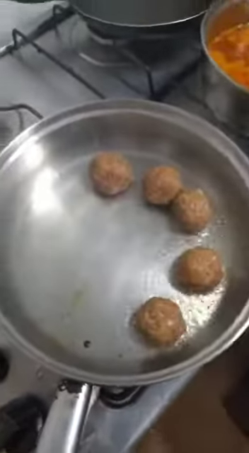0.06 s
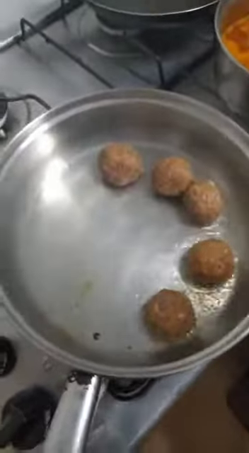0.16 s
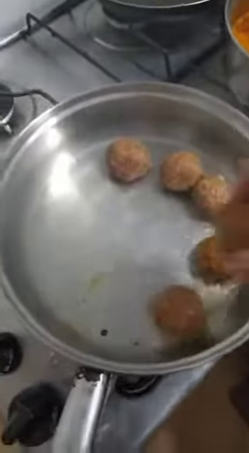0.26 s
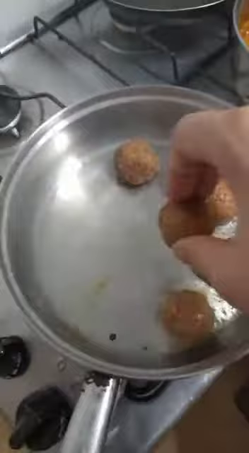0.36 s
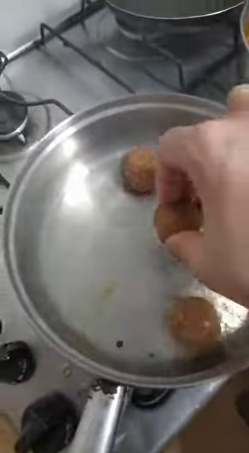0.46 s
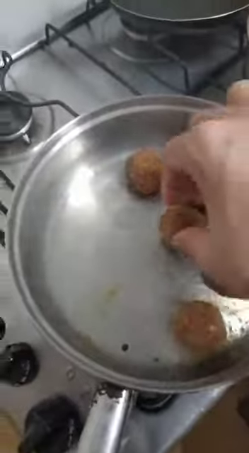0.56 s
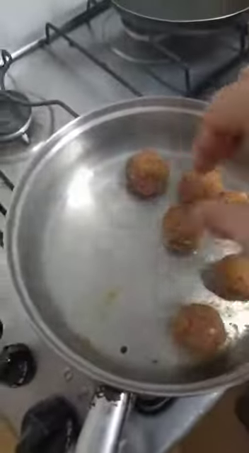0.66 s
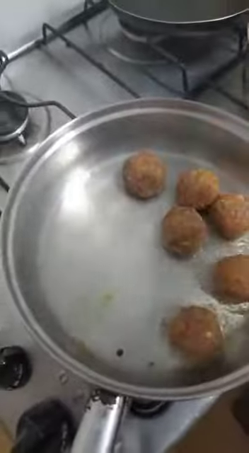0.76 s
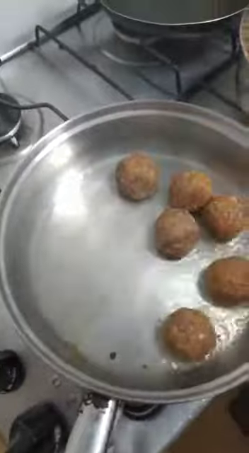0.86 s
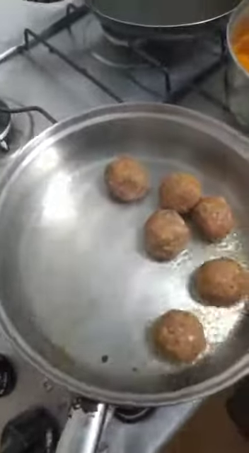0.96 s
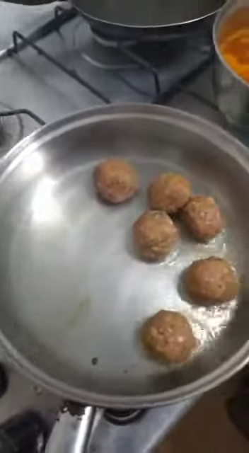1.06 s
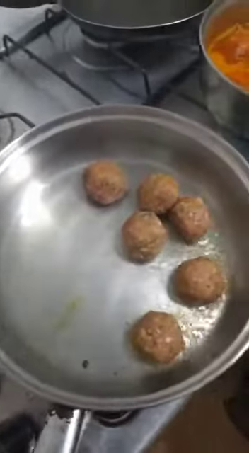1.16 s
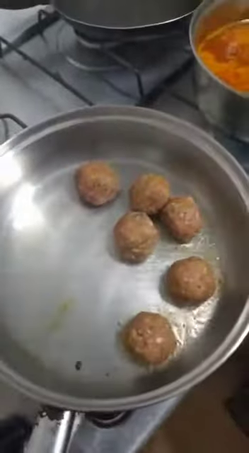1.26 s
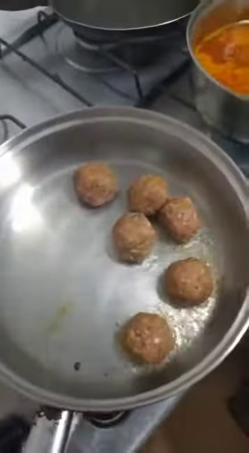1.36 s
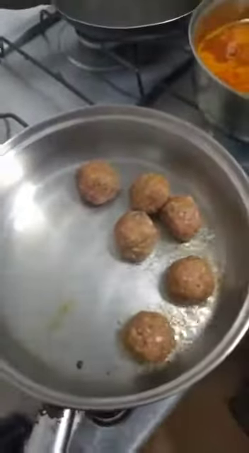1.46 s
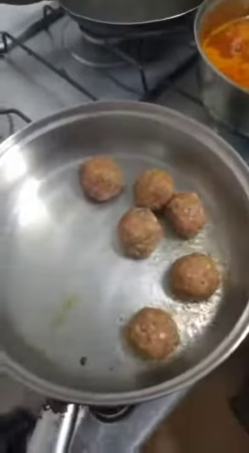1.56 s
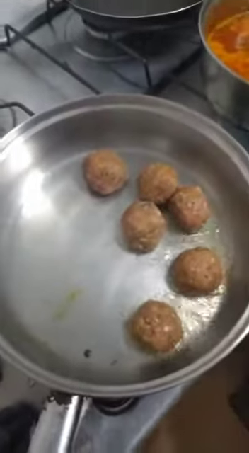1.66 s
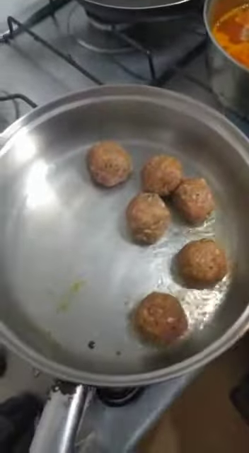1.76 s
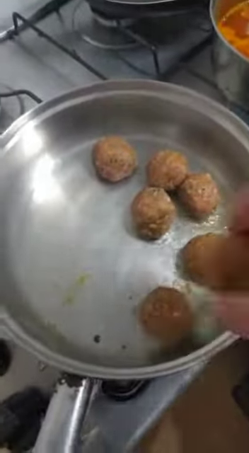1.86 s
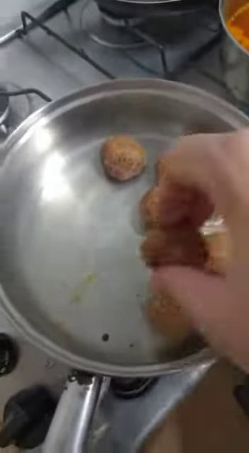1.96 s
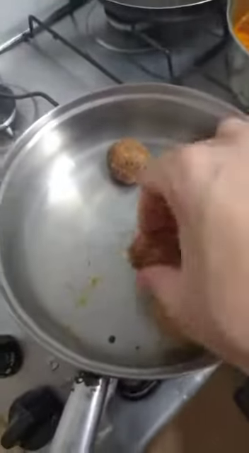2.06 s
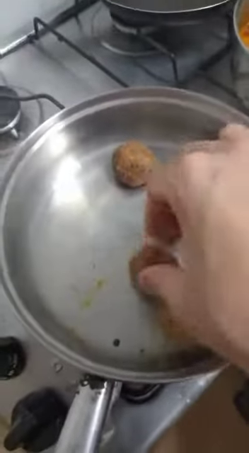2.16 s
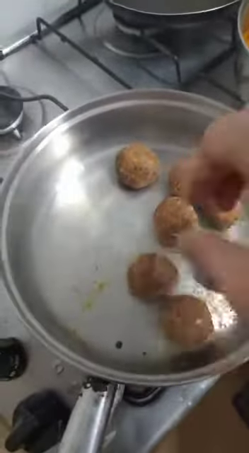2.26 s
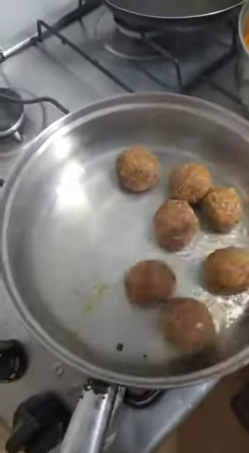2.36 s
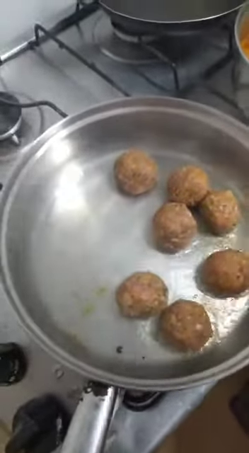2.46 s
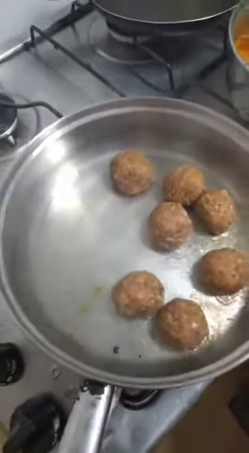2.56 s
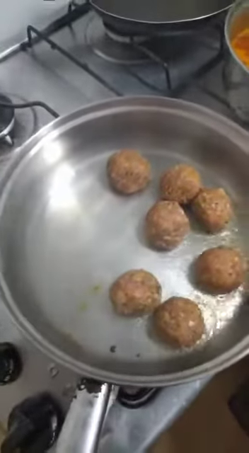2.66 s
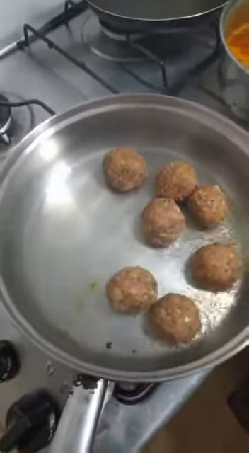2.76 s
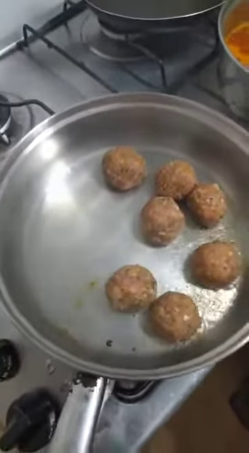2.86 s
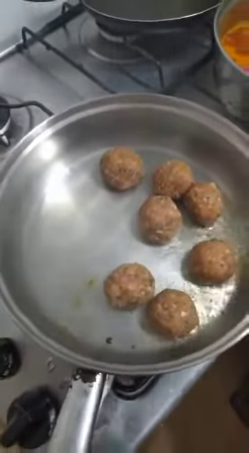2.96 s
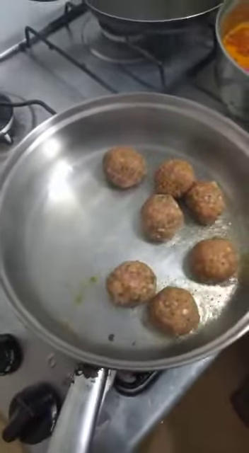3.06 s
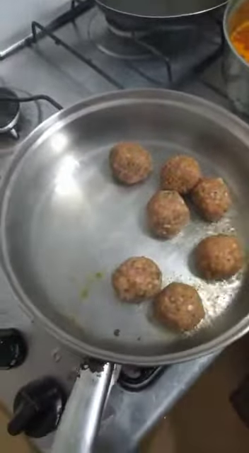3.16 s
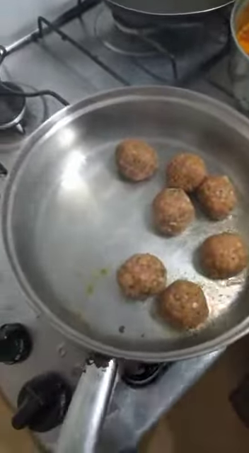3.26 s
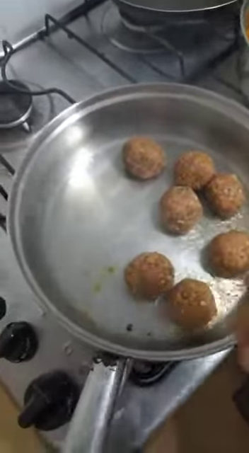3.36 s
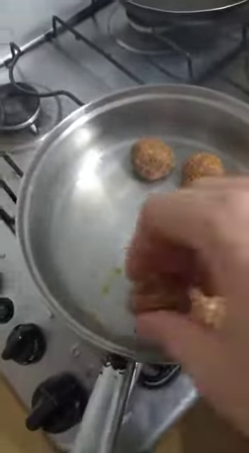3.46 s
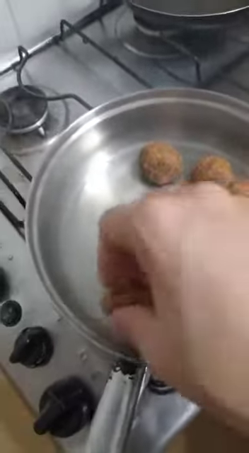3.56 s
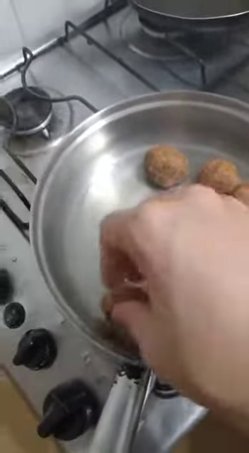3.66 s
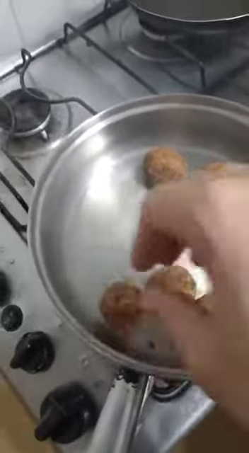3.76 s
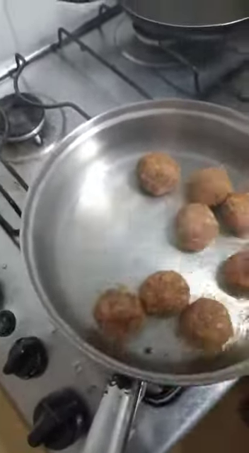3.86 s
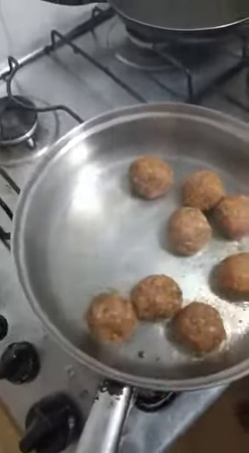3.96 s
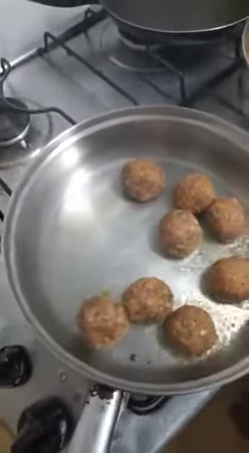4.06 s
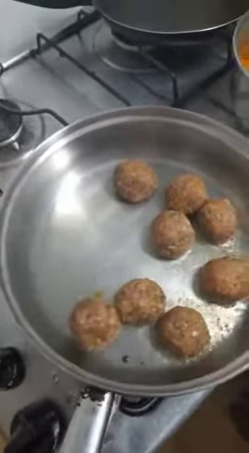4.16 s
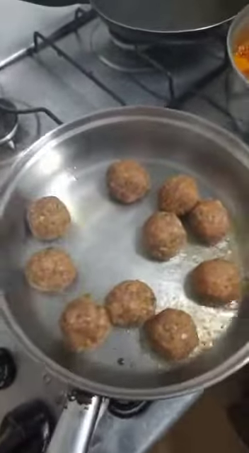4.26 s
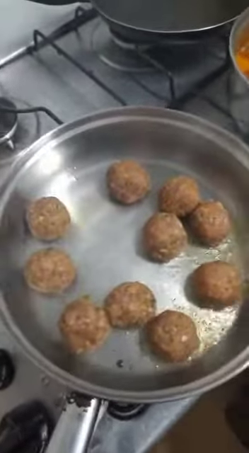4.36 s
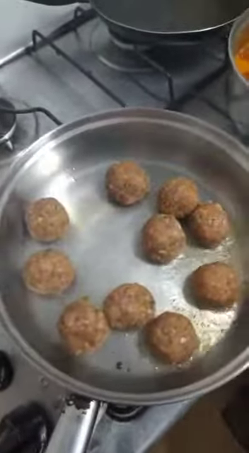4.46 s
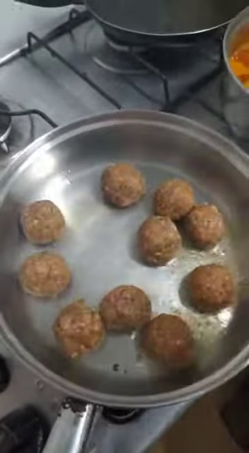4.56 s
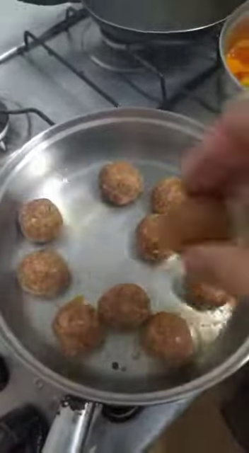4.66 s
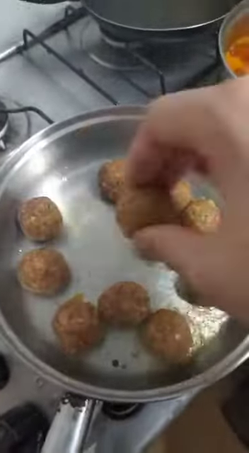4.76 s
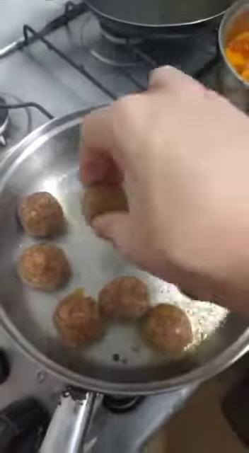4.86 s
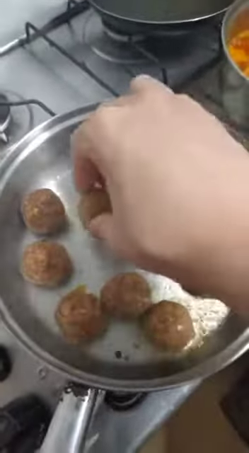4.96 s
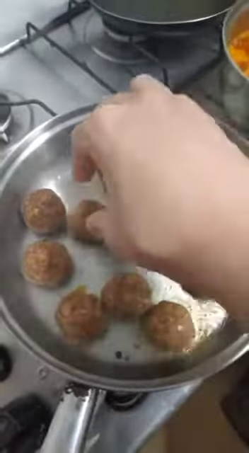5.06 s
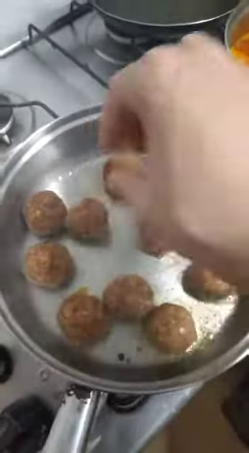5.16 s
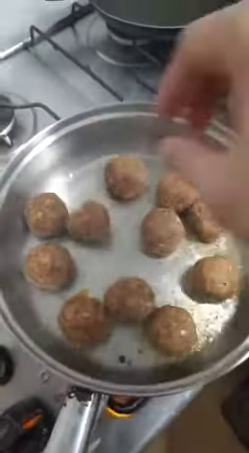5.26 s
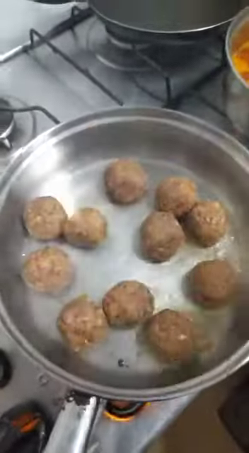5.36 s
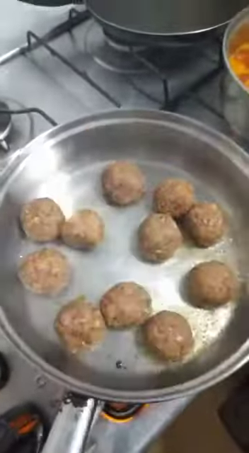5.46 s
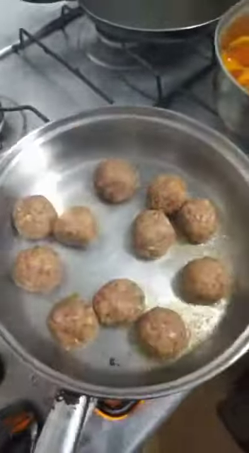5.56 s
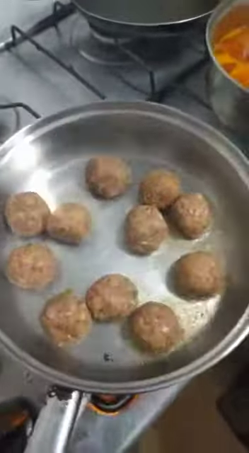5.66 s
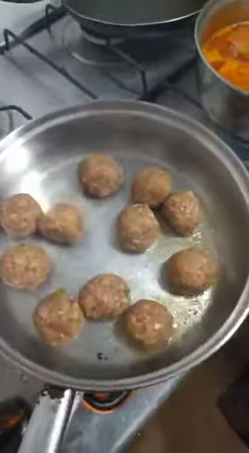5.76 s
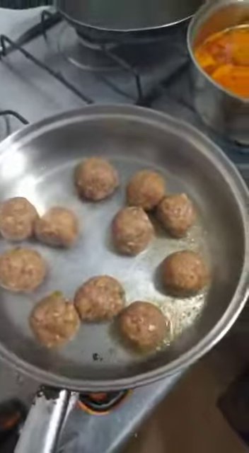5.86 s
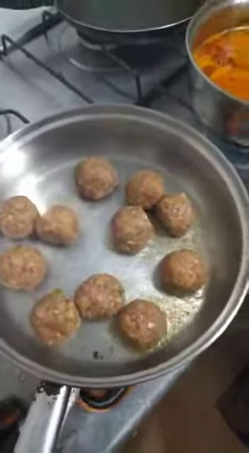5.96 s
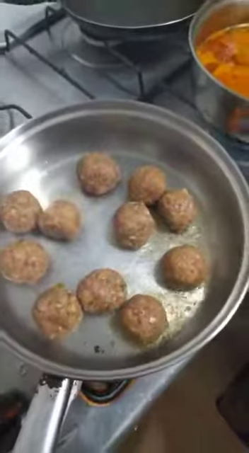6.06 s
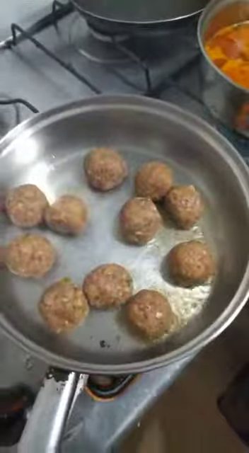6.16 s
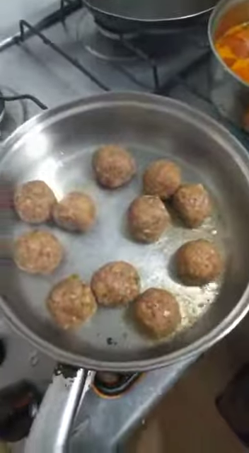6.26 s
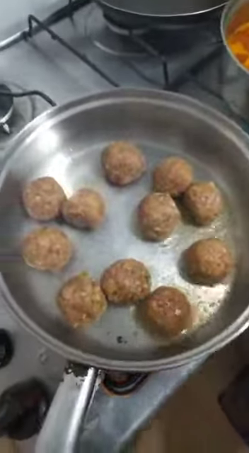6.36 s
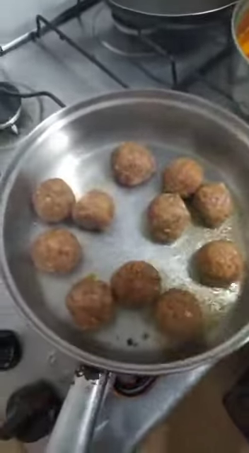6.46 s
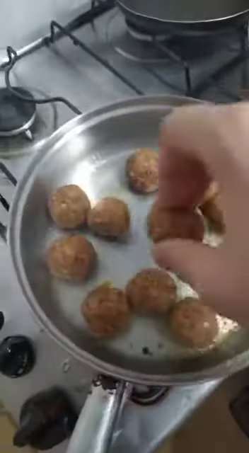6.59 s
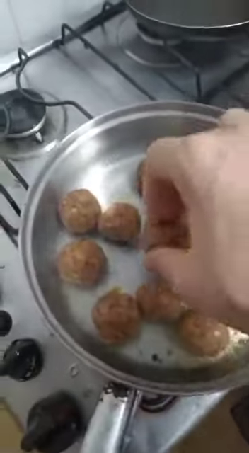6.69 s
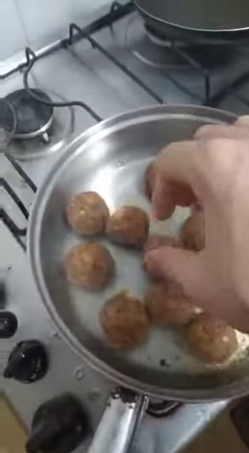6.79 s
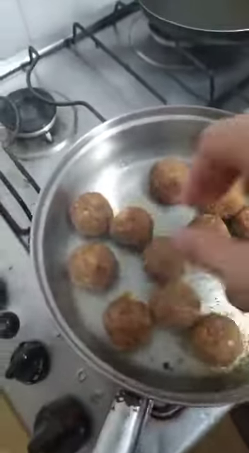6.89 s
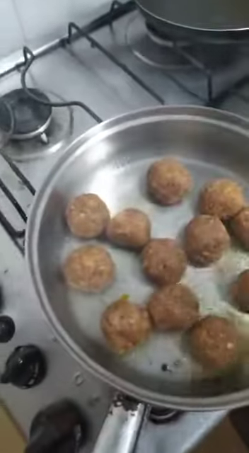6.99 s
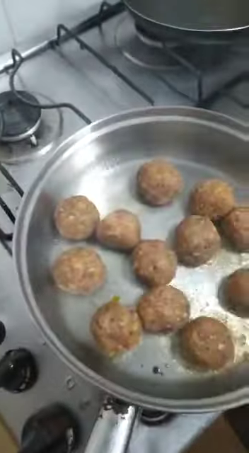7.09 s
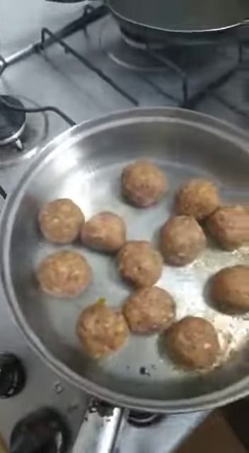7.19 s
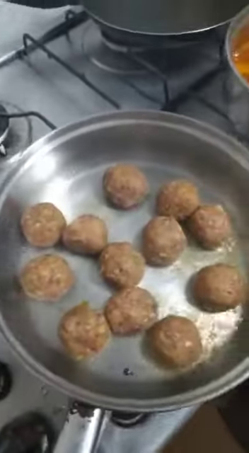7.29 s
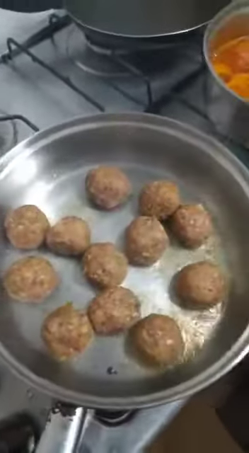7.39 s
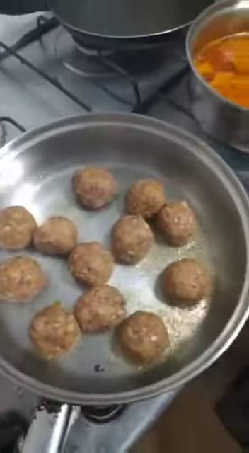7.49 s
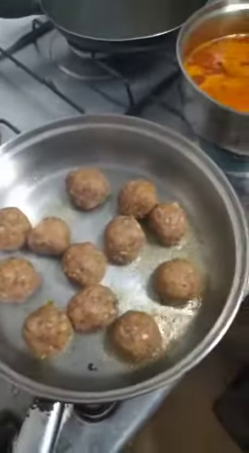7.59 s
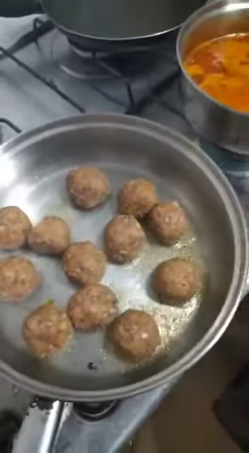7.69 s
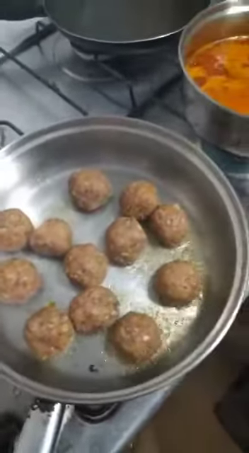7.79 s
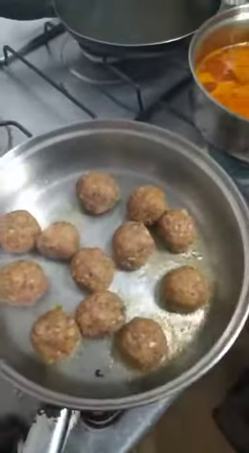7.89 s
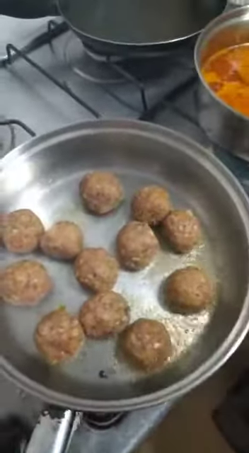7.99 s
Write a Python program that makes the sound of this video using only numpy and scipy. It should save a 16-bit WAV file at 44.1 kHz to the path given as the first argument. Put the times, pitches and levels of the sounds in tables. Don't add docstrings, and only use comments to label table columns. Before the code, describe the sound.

Meatballs sizzle loudly in a hot oiled pan, spitting and crackling, then the sound cuts abruptly to a quieter, sparser sizzle.

```python
import sys
import numpy as np
from scipy import signal
from scipy.fft import rfft, irfft
from scipy.io import wavfile
from scipy.ndimage import uniform_filter1d

SR = 44100
rng = np.random.default_rng(int(sys.argv[2]) if len(sys.argv) > 2 else 0)


def gain_from_db(level_db):
    decades = np.asarray(level_db, float) / 20
    return 10 ** decades


def store_wav(level_fs):
    pcm = np.round(np.clip(np.atleast_2d(level_fs), -1, 1) * 32767)
    wavfile.write(sys.argv[1], SR, pcm.T.astype(np.int16))


N = 354123
CUT_S = 4.293
REST_DB = [-26.5, -36.5]


def evened(x):
    return x / np.sqrt(np.mean(x ** 2) + 1e-20)


def read(points, hz):
    f, value = np.transpose(points)
    return np.interp(np.log(hz + 1), np.log(f + 1), value)


def band(x, lo_hz, hi_hz):
    sos = signal.butter(2, [lo_hz, min(hi_hz, SR / 2.1)], "band", fs=SR, output="sos")
    return signal.sosfilt(sos, x)


def drift(shape, across, along):
    field = uniform_filter1d(rng.standard_normal(shape), max(int(across), 1), -2)
    return evened(uniform_filter1d(field, max(int(along), 1), -1))


def sides(db):
    return gain_from_db(np.array([[.5], [-.5]]) * db)


def shot(values, t):
    return np.take(values, 1 * (t > CUT_S))


def swells(rows, width_s, t):
    return sum(db * np.exp(-((t - s) / width_s) ** 2) for s, db in rows)


def kitchen():
    # [f/Hz, level/dB]
    air_colour = [(12, -32), (20, 3.5), (59, -14.5), (102, -5.5), (166, -7), (218, -3), (320, -1),
                  (484, -8.5), (900, -7.5), (1170, -3), (1980, -120)]
    air_db = [-52.5, -63]
    # [start t/s, length/s, level/dB]
    hum_spells = [(-.05, 0.56, -60.5), (.72, .68, -60), (1.46, 0.74, -60), (2.285, 0.87, -59.5),
                  (3.332, 0.3, -56), (3.65, 0.67, -57.5), (4.35, 1.15, -65.5), (5.599, .8, -72),
                  (6.45, 0.54, -67.5), (7.035, 0.38, -78), (7.6, 0.25, -71)]
    hum_edge_s = 0.088
    time = np.arange(N) / SR
    common, own = rng.standard_normal(N), rng.standard_normal((2, N))
    hz, t, z = signal.stft(1.1 * common + .62 * own, SR, nperseg=2048)
    z = z * gain_from_db(read(air_colour, hz)[:, None] + 3.5 * drift(z.shape[1:], 5.4, 3.6))
    air = evened(signal.istft(z, SR, nperseg=2048)[1][:, :N]) * gain_from_db(shot(air_db, time))
    gate = sum(gain_from_db(db) * (abs(time - s - length / 2) < length / 2) for s, length, db in hum_spells)
    hum = evened(band(band(rng.standard_normal(N), 45, 63.6), 50, 76))
    return air * sides(-0.31) + uniform_filter1d(gate, int(hum_edge_s * SR)) * hum


def bumps():
    # [t/s, knock level/dB, push level/dB, left-right level/dB, push length/s, knock top f/Hz]
    rows = [
        (0.82, -32, -60, -22, 0.057, 1490),
        (3.163, -38.5, -53.5, -14, 0.023, 597),
        (3.544, -40.5, -52, -19, 0.02, 601),
        (5.082, -40.5, -82, -9, .03, 1520),
        (5.097, -48.5, -76, -10, .03, 300),
        (5.087, -34, -57, -24, 0.2, 2530),
        (6.388, -39, -65, 10, 0.034, 2000),
        (6.481, -38.5, -73, 19, .04, 2480),
    ]
    size = 6000
    out, t = np.zeros((2, N)), np.arange(size) / SR
    for s, knock_db, push_db, pan_db, push_s, top_hz in rows:
        thump = rng.standard_normal(size) + 0.26 * np.sin(2 * np.pi * 280 * t)
        knock = band(thump * t * np.exp(-t / 0.0014), 76, top_hz)
        puff = band(-np.exp(-((t - .011) / 0.0066) ** 2), 2.2, 70)
        sway = np.sin(2 * np.pi * (17 * t - .3)) * np.exp(-(t / push_s) ** 4)
        push = puff + 0.25 * sway * np.minimum(1, (t[-1] - t) / .012)
        sound = gain_from_db(knock_db + 1.0) * knock / abs(knock).max()
        sound += gain_from_db(push_db + 12.5) * push / abs(push).max()
        out[:, round(s * SR):][:, :size] += sound * sides(pan_db)
    return out


def strays(count=17):
    over_rest_db, spread_db = [-1.5, -21, 0.5], 7.5
    draw = rng.random((count, 4))
    s = draw[:, 0] * N / SR
    return np.c_[s, shot(REST_DB, s)[:, None] + over_rest_db + spread_db * (draw[:, 1:] - .5)]


def pops():
    # [t/s, crack level/dB, thud level/dB, hiss level/dB]
    spit_rows = [(.409, -20.5, -46, -32), (.5542, -25, -59, -23), (.597, -14, -46, -20),
                 (.7184, -29.5, -51, -7), (.817, -19, -31, -5.5), (1.0204, -28, -48, -6),
                 (1.2555, -24, -50, -8.5), (1.263, -16, -36.5, -3.5), (1.27, -20, -50, -9),
                 (1.3593, -19.5, -28.5, -26), (1.7844, -24, -47, -21), (1.8896, -22.5, -46, -4),
                 (2.1434, -26.5, -45, -24), (2.2963, -18, -45, -27), (2.31, -23.5, -48, -22),
                 (2.335, -24, -47, -14), (2.47, -23.5, -48, -17), (2.505, -23, -48, -19),
                 (2.492, -14, -44, -32), (3.5294, -23, -43, -22), (3.7901, -19, -51, -17),
                 (4.0564, -31, -48.5, -15), (4.2494, -53, -45, -5.5), (4.891, -30.5, -54, -34),
                 (5.0634, -38, -54, -26), (5.362, -33, -50, -26), (5.4485, -36, -58, -46),
                 (5.6417, -30.5, -64, -29), (5.9448, -35, -54, -37), (6.1172, -34, -58, -31),
                 (6.4787, -25.5, -44, -39), (7.2364, -35, -56, -23), (7.2706, -23, -40, -16),
                 (7.3702, -31, -39, -32), (7.433, -31.5, -48.5, -26), (7.4435, -30, -51, -27)]
    # [t/s, peak level/dB]
    crackles = [(0.095, -36), (0.256, -41), (0.287, -31), (0.364, -32), (0.425, -34), (0.481, -38),
                (0.659, -34), (0.697, -37), (0.752, -31), (0.934, -33), (1.004, -29.5), (1.515, -32),
                (1.651, -43), (2.13, -28), (2.572, -32), (2.741, -27), (2.919, -26), (2.994, -30),
                (3.341, -33), (3.664, -31), (3.908, -39.5), (3.928, -33.5), (3.974, -25), (4.042, -34),
                (1.105, -35), (2.041, -31), (4.648, -42), (5.406, -37.5), (6.893, -40), (7.843, -42),
                (7.934, -42), (7.982, -40), (3.57, -35)]
    # [t/s, peak level/dB]
    flicks = [(0.1569, -11), (0.202, -17), (0.666, -13.5), (0.692, -11.5), (0.7457, -5.5), (0.782, -9.5),
              (0.868, -9.5), (0.948, -12.5), (1.0647, -15), (1.2534, -11.5), (1.2962, -9), (1.3464, -18.5),
              (1.4168, -12), (1.687, -12.5), (1.7267, -13.5), (1.853, -11.5), (2.117, -15), (2.3684, -10),
              (2.3855, -5), (2.398, -7.5), (2.4492, -8.5), (2.6012, -15.5), (2.8888, -14), (3.112, -11),
              (3.3485, -14.5), (3.463, -12), (3.578, -15.5), (3.6595, -11), (3.9166, -10), (4.1553, -13),
              (4.4087, -22.5), (4.6187, -23.5), (4.841, -21), (5.0707, -20.5), (5.362, -27),
                   (5.4024, -23), (5.4497, -21.5), (5.589, -26), (5.8177, -19), (5.8764, -22),
                   (5.8825, -19), (6.0526, -19), (6.1173, -21), (6.4358, -19.5), (6.679, -27),
                   (6.8277, -26), (7.0343, -27.5), (7.2363, -23), (7.3565, -28), (7.4287, -20),
                   (7.779, -25), (7.9352, -28), (7.9536, -26.5), (7.9695, -20.5), (6.893, -24),
                   (7.843, -26), (4.648, -25)]
    crackle_db, flick_db = [-4.5, -14, -30], [-16.5, -45, 0.5]
    pan_db, pan_scatter_db = -4.5, 8
    size = 1200
    out, t = np.zeros((2, N + size)), np.arange(size) / SR
    small = [(s, *np.add(db, crackle_db)) for s, db in crackles]
    small += [(s, *np.add(db, flick_db)) for s, db in flicks]
    s, crack_db, thud_db, hiss_db = np.transpose([*spit_rows, *strays(), *small])
    draw = rng.standard_normal((len(s), 3, size))
    noise = 0.95 * draw[:, :1] + 0.75 * draw[:, 1:]
    noise[:, :, 40] += 8
    parts = ((crack_db - 7.5, 800, 6500, .0024), (thud_db - 1, 180, 2200, .003),
             (hiss_db - 11.5, 6000, 13000, .0016), (hiss_db - 19, 3000, 6500, .005))
    spits = 0
    for db, lo_hz, hi_hz, fade_s in parts:
        puff = band(noise * t / fade_s * np.exp(-2 * t / fade_s), lo_hz, hi_hz)
        spits = spits + puff * (gain_from_db(db + 8.5) / abs(puff).max((1, 2)))[:, None, None]
    for at, spit, place in zip(s, spits, rng.random(len(s))):
        out[:, round(at * SR):][:, :size] += spit * sides(pan_db + pan_scatter_db * (place - .5))
    return out[:, :N]


def flares(t):
    # [t/s, lift level/dB, fade/s]
    rows = [(.62, 5, 0.4), (1.6, 0.5, 1), (2.27, 5.5, 0.33), (2.7, 1.5, 0.35), (3.75, 3, 0.39),
            (4.02, 2.5, 0.45), (4.6, 1.9, 0.66), (6.27, 1, 0.18), (6.7, 1.5, 1), (7.15, 1, 0.25),
            (7.95, 4, .3)]
    rise_s = 0.055
    total_db = 0
    for s, db, fade_s in rows:
        age = np.maximum(t - s, 0)
        same_shot = (t > CUT_S) == (s > CUT_S)
        total_db = total_db + db * same_shot * (1 - np.exp(-age / rise_s)) * np.exp(-age / fade_s)
    return total_db


def bubbles(per_s, spread_db, cycles, reach_s, lag_s, count=20):
    when, kind, size, place, sign = rng.random((int(per_s * N / SR), 5)).T
    size = gain_from_db(spread_db * np.minimum(-np.log(size + 1e-9), 6)) * np.sign(sign - .5)
    delay = (lag_s + reach_s * (2 * place - 1)) * SR
    out, colour = np.zeros((2, N)), 0
    for k, hz in enumerate(np.geomspace(350, 17000, count)):
        t = np.arange(int(cycles * SR / hz) + 4) / SR
        burst = np.sin(2 * np.pi * hz * t) * t * hz * np.exp(-5 * t * hz / cycles)
        burst /= np.linalg.norm(burst)
        colour = colour + abs(rfft(burst, 2048)) ** 2
        mine = (kind * count).astype(int) == k
        at = [np.clip(when[mine] * N + shift, 0, N - 1).astype(int) for shift in (delay[mine], 0)]
        clicks = [np.bincount(a, size[mine], N) for a in at]
        out += signal.oaconvolve(clicks, burst[None], axes=1)[:, :N]
    flatten = np.roll(irfft(1 / np.sqrt(colour + 0.016 * colour.mean())), 1024)
    return evened(signal.oaconvolve(out, flatten[None], "same", axes=1))


def fizz():
    # [f/Hz, level/dB]
    pan_colour = [(400, -20), (650, -20.5), (1000, -14.5), (1300, -15.5), (2000, -10.5), (3250, -9),
                  (3620, -12), (3950, -7.5), (4200, -6), (4800, -8), (5400, -4.5), (6600, -3.5),
                  (8200, -1.5), (10500, -0.65), (12200, -5), (14300, -7)]
    # [t/s, depth level/dB]
    shades = [
        (.3, -1.5),
        (.6, 0),
        (1.94, -1.3),
        (2.24, -2.5),
        (3.47, -0.5),
        (3.67, -1.5),
        (4.47, -1.5),
        (6.21, -1),
        (6.62, -0.5),
        (7.8, -1.4),
    ]
    # [t/s, swell level/dB]
    gushes = [
        (.82, 0.5),
        (1.34, 1.5),
        (2.48, 1),
        (3.05, 0.5),
        (4.27, 3),
        (5.2, 0.5),
        (7.27, 2.5),
    ]
    # [t/s, left-right level/dB]
    turn = [(0, 1.5), (.6, 0), (1.6, -0.1), (2.1, -0.5), (2.65, 1.2), (3.1, 0.5), (3.6, -.5), (4.2, 1.1),
            (4.4, 1.5), (4.7, 0), (5.35, 1.5), (6.2, 0.1), (6.9, 1), (8.03, 1)]
    shade_s, gush_s, flicker_db = 0.035, 0.1, 0.5
    spatter_rest_db, gurgle_rest_db = [1.24, 1.5], [-2, -3]
    near = bubbles(per_s=11000, spread_db=2.0, cycles=6.6, reach_s=.0002, lag_s=.00006)
    sources = [near, rng.standard_normal((2, N))]
    hz, t, (near, wash) = signal.stft(sources, SR, nperseg=256, noverlap=128)
    same = 0.29 * np.sinc(hz / 2500)[:, None]
    z = 0.55 * near + 0.84 * np.array([wash[0], same * wash[0] + np.sqrt(1 - same ** 2) * wash[1]])

    flare_db, gush_db = flares(t), swells(gushes, gush_s, t)
    treble_db = flare_db + swells(shades, shade_s, t) + flicker_db * drift((1, len(t)), 1, 33)[0]
    spatter_db = shot(spatter_rest_db, t) + flare_db + gush_db
    gurgle_db = shot(gurgle_rest_db, t) + 0.9 * flare_db + gush_db
    mid = read([(900, 0), (1600, 1), (4800, 1), (6500, 0)], hz)[:, None]
    low = read([(1300, 1), (1600, 0)], hz)[:, None]
    juice_db = mid * (spatter_db - treble_db) + low * (gurgle_db - treble_db)

    patches_db = 1.2 * drift(z.shape[1:], 6, 10) + .8 * drift(z.shape, 10, 4)
    patchy = read([(5000, 1), (8000, 1.0), (12000, 0.1), (14000, 0.8)], hz)[:, None]
    db = read(pan_colour, hz)[:, None] + juice_db + patchy * patches_db
    db = db + .35 * drift((1, len(t)), 1, 4)
    x = signal.istft(z * gain_from_db(db), SR, nperseg=256, noverlap=128)[1][:, :N]
    time = np.arange(N) / SR
    level_db = shot(REST_DB, time) + np.interp(time, t, treble_db) + 2.5
    return evened(x) * gain_from_db(level_db) * sides(np.interp(time, *np.transpose(turn)))


def scene():
    return kitchen() + bumps() + pops() + fizz()


def ports(x):
    # [f/Hz, width f/Hz, level/dB]
    cavities = [
        (9620, 4200, 2.5),
        (9266, 2300, 9.5),
    ]
    hz = np.fft.rfftfreq(1024, 1 / SR)
    lift = [gain_from_db(db / (1 + (2 * (hz - f) / width) ** 2)) for f, width, db in cavities]
    return signal.oaconvolve(x, np.roll(irfft(lift), 512, 1), "same", axes=1)


def mute(x):
    # [f/Hz, threshold/spreads of a random field]
    muting = [(2200, -2.4), (2450, -1.6), (2710, -.7), (2970, -1), (3270, -.2), (3620, .55), (4000, -.75),
              (4430, -.9), (4910, -.45), (5430, -.65), (6000, -1.3), (7000, -1.8), (7600, -4), (11300, -4),
              (11800, -1.1), (13400, -1.15), (14500, -.75), (15300, -.8)]
    # [f/Hz, level/dB]
    coarseness = [(350, -21), (900, -19), (1200, -16.5), (1600, -11), (2000, -5), (2400, 0), (3200, 1.5),
                  (3600, 2.5), (4200, 4), (5500, 5.5), (7200, 4.5), (9000, -2.5), (10300, 0), (11600, 4.5),
                  (13500, 4.5), (15700, 2)]
    top_hz, step_scatter_db, rounding, window_swaps = 15760, 3.4, .25, .45
    hop, lead = 1024, 2048 - 143
    frames = N // hop + 4
    pair = np.pad([x[0] + x[1], x[0] - x[1]], ((0, 0), (lead, frames * hop - N - lead)))
    pair = pair.reshape(2, frames, hop) / 2

    n, k = np.arange(2 * hop) + .5, np.arange(hop) + .5
    lapped = np.cos(np.pi / hop * np.outer(n + hop / 2, k)) * np.sqrt(2 / hop)
    steep = np.kaiser(hop + 1, 4 * np.pi)
    rises = np.array([np.sin(np.pi * n[:hop] / hop / 2), np.sqrt(np.cumsum(steep)[:hop] / steep.sum())])
    rise = rises[np.cumsum(rng.random(frames) < window_swaps) % 2]
    window = np.c_[rise[:-1], rise[1:, ::-1]]
    z = (np.concatenate([pair[:, :-1], pair[:, 1:]], axis=2) * window) @ lapped

    edges = np.r_[0:40:4, 40:96:8, 96:144:12, 144, 160, 176, 196, 216, 240, 264, 292, 320:hop:32]
    which, hz = np.searchsorted(edges, k) - 1, k * SR / hop / 2
    band_hz = (np.bincount(which, hz) / np.bincount(which))[which]
    blocks = (2, len(edges), frames - 1)

    level = np.sqrt(abs(uniform_filter1d((z ** 2).mean((0, 2)), size=3))) + 1e-9
    scatter = evened(drift(blocks, 1, 1) + .6 * drift(blocks[1:], 4, 1))
    scatter = scatter[:, which].transpose(0, 2, 1)
    step = level[:, None] * gain_from_db(read(coarseness, hz) + step_scatter_db * scatter)
    z = np.sign(z) * step * np.floor((abs(z) / step) ** (3 / 4) + rounding) ** (4 / 3)

    field = .4 * drift(blocks, 1, 1) + drift(blocks, 1, 3)
    field = evened(field + .55 * drift(blocks[1:], 1, 4) + .3 * drift(blocks[1:], 2, 2))
    field = field[:, which].transpose(0, 2, 1)
    heard = (field - .3 * scatter > read(muting, band_hz)) * (hz < top_hz)
    kept = ((z * heard) @ lapped.T) * window
    joined = (kept[:, 1:, :hop] + kept[:, :-1, hop:]).reshape(2, -1)
    mid, side = joined[:, lead - hop:lead - hop + N]
    return np.array([mid + side, mid - side])


def top_cut(x):
    return signal.sosfilt(signal.butter(12, 16880, fs=SR, output="sos"), x)


def record(dry):
    return top_cut(mute(ports(dry)))


dry = scene()
out = record(dry)
store_wav(out)
```